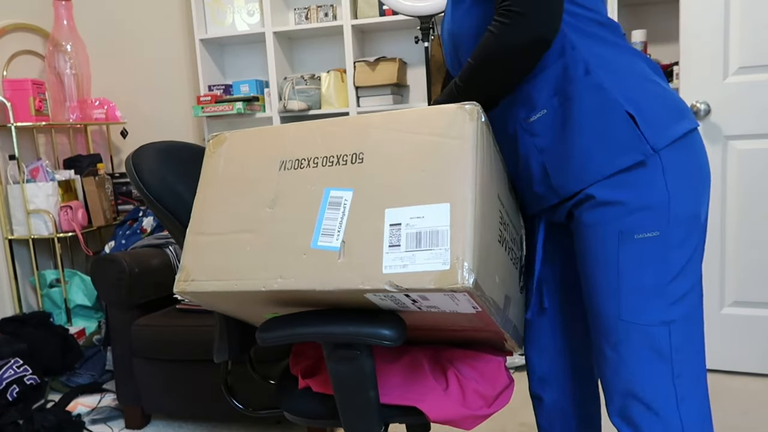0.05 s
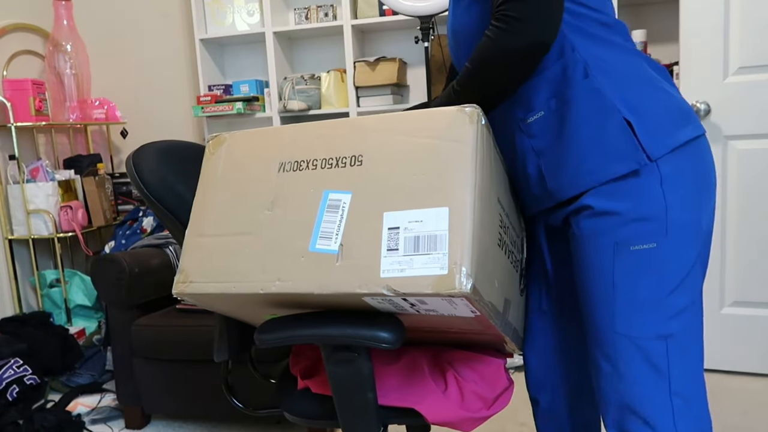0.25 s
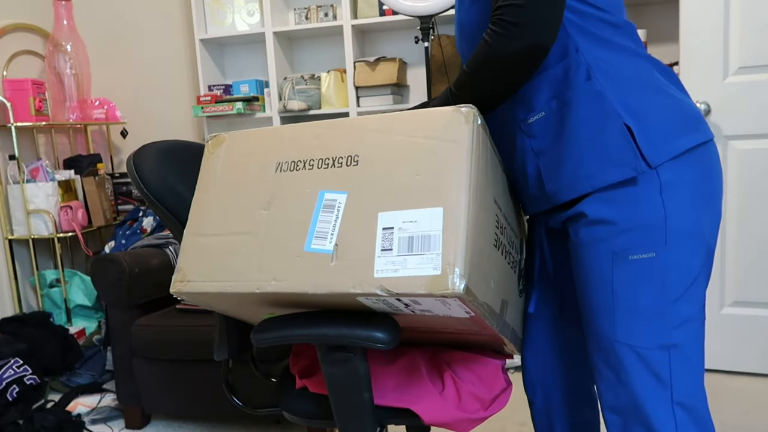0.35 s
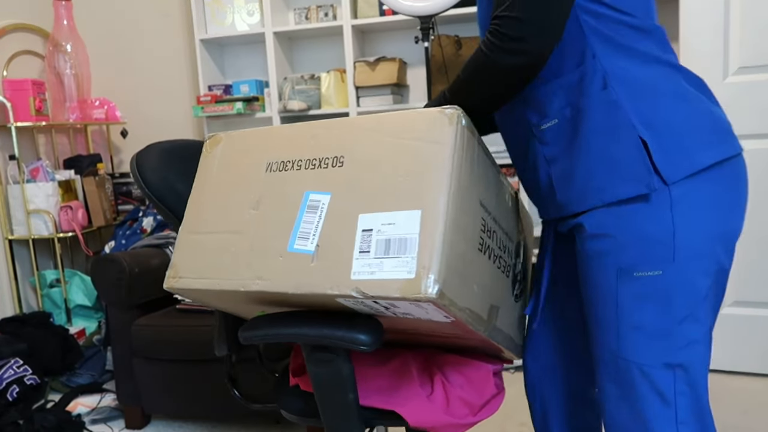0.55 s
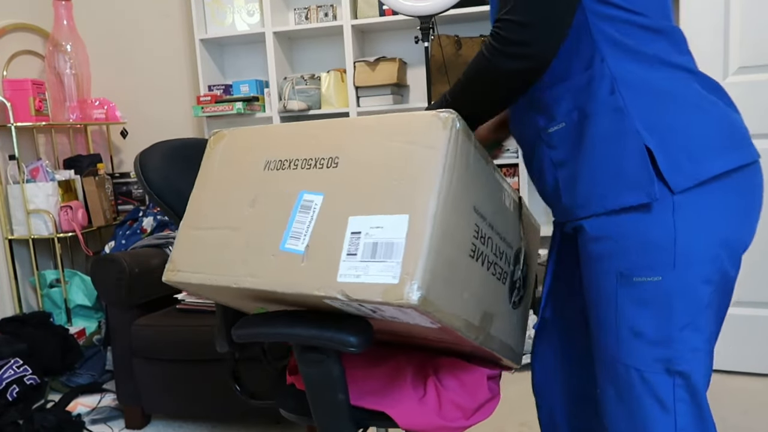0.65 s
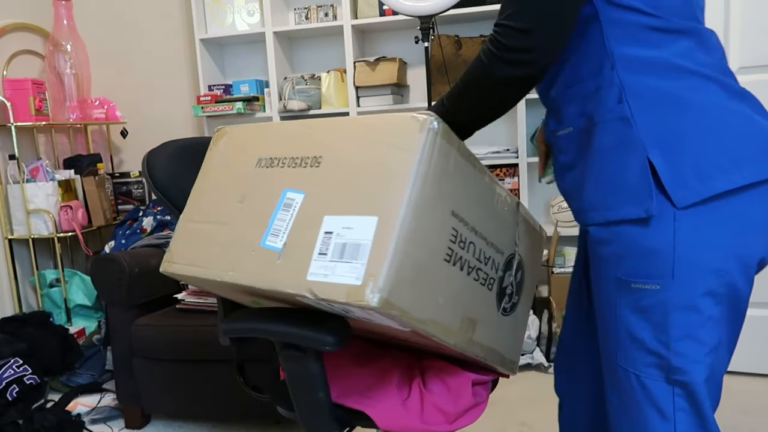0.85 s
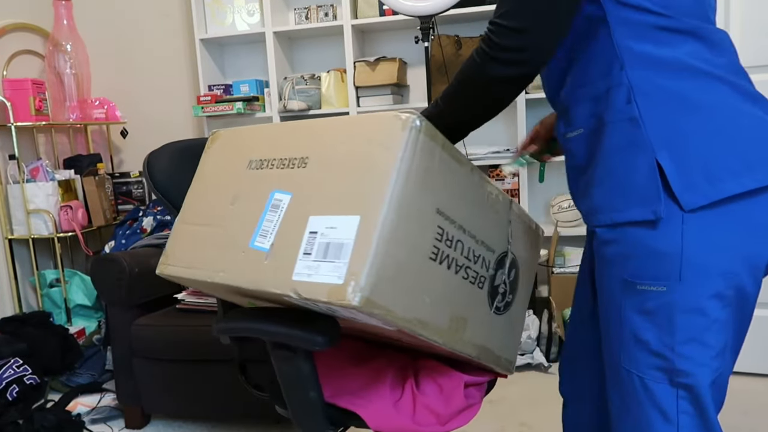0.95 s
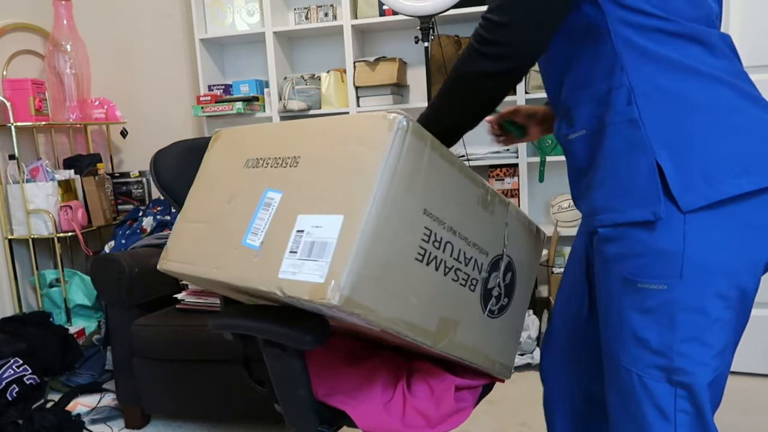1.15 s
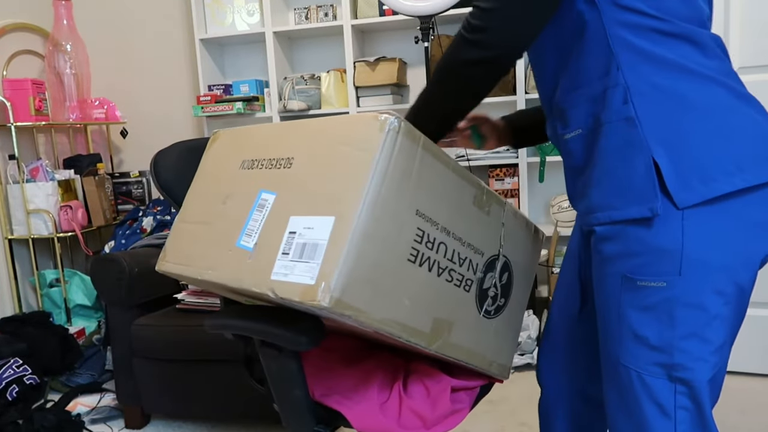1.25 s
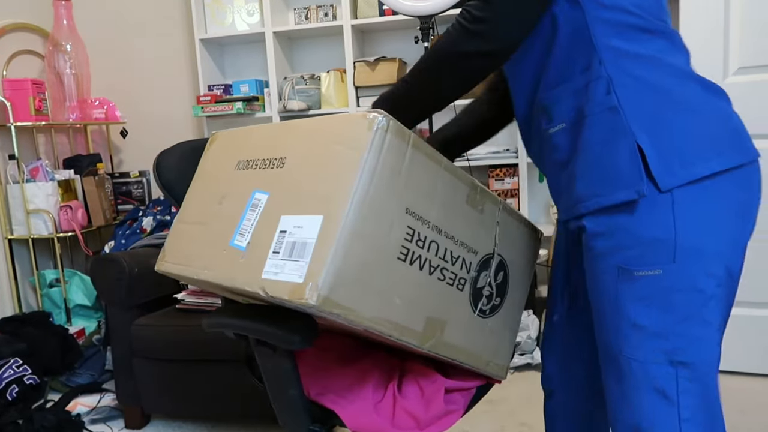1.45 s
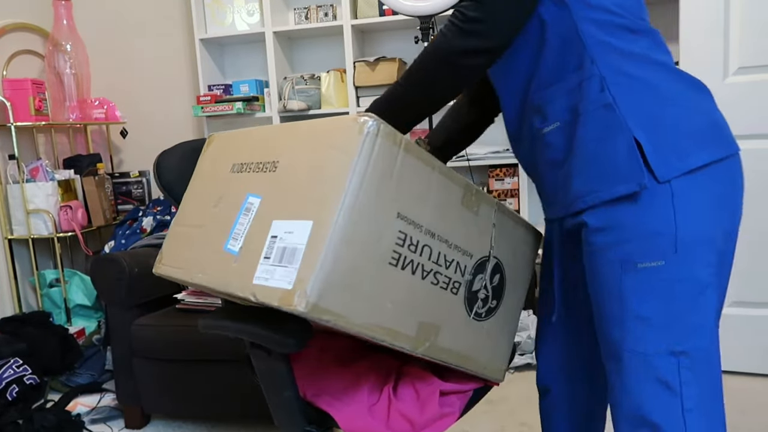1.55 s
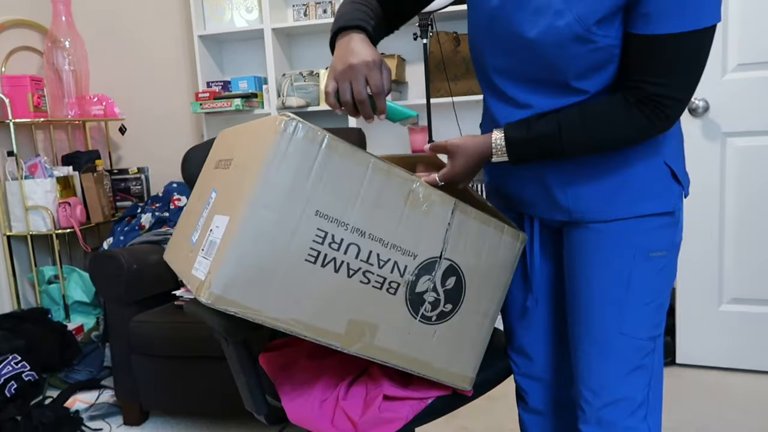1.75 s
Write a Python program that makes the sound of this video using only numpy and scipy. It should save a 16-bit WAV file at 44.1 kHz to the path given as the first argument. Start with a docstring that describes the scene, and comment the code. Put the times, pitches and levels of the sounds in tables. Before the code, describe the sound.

A large cardboard box gives a sharp crunching knock against a chair arm, drags with a rough papery hiss and hollow rumble, slides faintly, then shifts with light taps; close stereo microphone, furnished room.

```python
"""A large cardboard box, dragged across a chair, hisses and hums after a knock on the chair arm; last it shifts gently.
Stick-slip clicks are filtered into the hiss of paper and drive the modes of its skin, panels and hollow.
Impulsive taps, thuds and bumps ring damped modes; a crumpling wall, faint squeaks and a furnished room add to them.
Two close microphone ports hear the bass alike and the treble nearly opposed, over steady room air and a whine.
Near the end the level dips briefly."""
import sys
import numpy as np
from scipy import signal
from scipy.fft import rfft, irfft
from scipy.io import wavfile

SR = 44100
rng = np.random.default_rng(int(sys.argv[2]) if len(sys.argv) > 2 else 0)


def pcm_store(signal):
    """Save signal as 16-bit PCM."""
    levels = np.round(np.clip(np.atleast_2d(signal), -1, 1) * 32767)
    wavfile.write(sys.argv[1], SR, levels.astype(np.int16).T)


def volts_from_db(level):
    """Convert decibel levels to linear amplitude ratios."""
    exponent = np.asarray(level, float) / 20
    return 10 ** exponent


N = 79380   # samples

# panel modes of the box: f/Hz, relative level/dB, t60/s
PANEL_MODES = [(265.3, -6, 0.24), (305, -6, 0.15), (333.4, 1.5, 0.16), (356.4, 0, 0.22), (405.4, 3.5, 0.12),
               (463.8, -2, 0.1), (549, 0, 0.048), (635, -7.5, 0.12), (690, -5, 0.16), (770, -1, 0.08),
               (884, -9, 0.16), (951, -11.5, 0.17), (1014, -9.5, 0.086), (1300, -9.5, 0.052)]
# slow modes of the air and the whole box: f/Hz, relative level/dB, t60/s
HOLLOW_MODES = [(60, -12.5, 0.055), (109.5, 0, 0.096), (164.5, 1.5, 0.16), (206.8, 5, 0.16)]


def rms_one(x):
    """Power normalisation: scale to unit mean square."""
    return x / np.sqrt(np.mean(x ** 2) + 1e-20)


def at_hz(points, hz):
    """Logarithmic frequency scale: interpolate a table's second column along log f."""
    table_hz, values = np.array(points)[:, 0], np.array(points)[:, 1]
    return np.interp(np.log(np.maximum(hz, 1)), np.log(np.maximum(table_hz, 1)), values)


def colour(x, points):
    """Minimum-phase filtering: a folded cepstrum gives the causal filter of a dB response."""
    size = 2 ** 17
    response_db = at_hz(points, np.arange(size // 2 + 1) * SR / size)
    cepstrum = irfft(np.log(volts_from_db(response_db)), size)
    cepstrum[1:size // 2] *= 2
    cepstrum[size // 2 + 1:] = 0
    return irfft(rfft(x, size) * np.exp(rfft(cepstrum)), size)[:N]


def drift(rate_hz):
    """Low-pass noise: two equal poles turn white noise into a slow fluctuation of unit rms."""
    pole = np.exp(-2 * np.pi * rate_hz * 40 / SR)   # one value every 40 samples
    noise = rng.standard_normal(N // 40 + 2002)
    slow = signal.lfilter([1], [1, -2 * pole, pole * pole], noise)[2000:]
    return np.interp(np.arange(N) / 40, np.arange(len(slow)), rms_one(slow))


def ring(drive, hz, t60):
    """Damped resonance: a unit click starts a decaying sine of initial height 1."""
    radius, angle = volts_from_db(-60 / (t60 * SR)), 2 * np.pi * hz / SR
    feedback = [1, -2 * radius * np.cos(angle), radius * radius]
    return signal.lfilter([0, np.sin(angle)], feedback, drive + 1e-18)


def slips():
    """Stick-slip friction: a dense random train of clicks of uneven size and either sign."""
    slips_per_s, spread_db = 3500, 2
    born = rng.random(N) < slips_per_s / SR
    size = volts_from_db(spread_db * np.minimum(rng.exponential(1, N), 5))
    return rms_one(born * size * rng.choice([-1, 1], N))


def shaken(modes, level_db, patchy_db=3.5):
    """Modal superposition: independent slip trains of wandering strength drive every mode."""
    def hum(envelope, drives):
        return sum(volts_from_db(db) * ring(envelope * drive, hz, t60)
                   for (hz, db, t60), drive in zip(modes, drives))
    drives = [slips() * volts_from_db(patchy_db * drift(18.0)) for _ in modes]
    return hum(volts_from_db(level_db), drives) / np.std(hum(1, drives))


def paper_hiss(hiss_db):
    """Friction noise: slips coloured by the paper surface, with more treble as the hiss grows louder."""
    # spectrum of paper on upholstery: f/Hz, level/dB per Hz
    paper_spectrum = [(290, -40), (500, -17.5), (637, 0), (800, -18), (909, -3), (1320, -9), (1430, -5),
                      (3990, -11.5), (6670, -18.5), (15000, -39.5)]
    split_hz, full_hiss_db, patchy_db = 3400, -25, 0.56
    brightens = 0.25   # treble gain, dB per dB of hiss
    hiss = rms_one(colour(slips(), paper_spectrum))
    dull = signal.sosfilt(signal.butter(2, split_hz, fs=SR, output="sos"), hiss)
    treble = signal.sosfilt(signal.butter(2, split_hz, "high", fs=SR, output="sos"), hiss)
    dull_db = patchy_db * drift(33)
    treble_db = brightens * (hiss_db - full_hiss_db) + patchy_db * drift(54)
    return dull * volts_from_db(dull_db) - treble * volts_from_db(treble_db)   # minus: the bands are opposed at the split


def rubbing():
    """Friction-driven vibration: slips hiss and excite the skin, the panels and the hollow."""
    # three stretches of rows: t/s, reference hiss level/dB,
    # panel weight/dB over that reference, whole-box rocking/dB over it (all before the trims below)
    rubbing_rows = [
        [(0.0, -52, 8, 15), (0.028, -58, -3, -27), (0.056, -62, 8.5, 13.5), (0.17, -71.5, 10, -5),
         (.21, -60, 2, -7)],
        [(1.635, -50.5, 9, 10), (1.68, -49.5, 0, 14), (1.72, -51.5, -13, 5), (1.745, -44, -1, -13),
         (1.8, -50, 4, 4)],
        [(0.33, -37, 1, -19), (0.382, -37.5, 3.5, -1.5), (0.5, -32.5, 1, 3.5), (0.545, -29, 2.5, 1),
         (0.58, -28, 9, -2), (0.622, -27, 3, 4), (0.672, -24.5, 3, -4), (0.768, -26, 4.5, 3),
         (0.84, -27.5, 0.5, -4), (0.902, -31, 0, -4), (0.938, -41, -9, -6), (1.016, -50, 3.5, -14),
         (1.026, -46.5, -9.5, -21), (1.11, -48.5, -2, -16), (1.128, -48.5, 12, -10), (1.15, -51, -1, -18),
         (1.21, -50.5, -3.5, -5), (1.278, -47.5, -2, -19), (1.324, -47.5, -2, -20), (1.358, -47, 0, -13),
         (1.486, -50.5, -6.5, -24), (1.514, -50.5, -15, -2), (1.554, -44.5, 5, 10), (1.584, -44, -9, -6),
         (1.6, -52.5, 8, -10)],
    ]
    # thin resonances of the paper skin: f/Hz, relative level/dB, t60/s
    skin_modes = [(1064, 1, 0.033), (1390, -5, 0.036), (1624, -2.5, 0.06), (1949, -2, 0.071),
                  (2372, -0.5, 0.029), (2626, -1.5, 0.026), (2830, -2, 0.023), (3190, -2.5, 0.028),
                  (3340, 0, 0.02), (3900, -3.5, 0.028)]
    surge_db, surge_rate_hz = 1.17, 15   # the drag is uneven
    s, *columns = np.transpose(sorted(map(tuple, np.concatenate(rubbing_rows))))
    hiss_db, weight_db, rocking_db = [np.interp(np.arange(N) / SR, s, c) for c in columns]
    hiss = paper_hiss(hiss_db)
    panels = shaken(PANEL_MODES, hiss_db + weight_db - 2.0)
    hollow = shaken(HOLLOW_MODES, hiss_db + rocking_db - 5.5, patchy_db=1.7)
    surging_db = hiss_db + surge_db * drift(surge_rate_hz)
    skin = shaken(skin_modes, surging_db - 8)
    return hiss * volts_from_db(surging_db - 2.5) + skin + panels + hollow


def squeaks():
    """Frequency locking: slips sustain narrow skin resonances, often several at once, during the slow slide."""
    # faint squeaks: start t/s, length/s, f/Hz, level/dB before the swell
    squeak_rows = [(1.28, 0.13, 1460, -50), (1.35, 0.12, 2420, -51), (1.38, .09, 1356, -50.5),
                   (1.236, .09, 4900, -60), (1.16, 0.05, 3390, -59.5), (1.39, 0.11, 2700, -61),
                   (1.235, 0.055, 3800, -58), (0.95, .04, 2100, -55), (1.06, 0.04, 600, -60)]
    out, t = 0, np.arange(N) / SR
    for start, length, hz, db in squeak_rows:
        swell = np.sin(np.pi * np.clip((t - start) / length, 0, 1))
        out = out + volts_from_db(db) * swell * rms_one(ring(slips(), hz, t60=0.051))
    return out


def crunch():
    """Crackling noise: as the wall crumples under the big knock, fibre snaps swell quickly and decay."""
    # spectrum of the crumpling: f/Hz, level/dB per Hz
    crunch_spectrum = [(180, -23), (330, -5), (700, -10), (1910, -9), (2400, -11), (5180, -14.5),
                       (11000, -30.5), (13800, -29.5), (15000, -95)]
    start_s, rise_s, t60_s, level_db = 0.2246, 0.015, 0.25, -16
    t = np.maximum(np.arange(N) / SR - start_s, 0)
    envelope = np.minimum(t / rise_s, 1) * volts_from_db(level_db - 60 * t / t60_s)
    snaps = slips() + rng.standard_normal(N)
    return rms_one(colour(snaps, crunch_spectrum)) * envelope


def blows(rows, modes, neighbour_sign=1):
    """Impulsive excitation: a short smooth push rings the modes near its favoured pitch; one track a blow."""
    out = np.zeros((len(rows), N))
    luck_db = rng.normal(0, 0.44, (len(rows), len(modes)))
    for k, (s, db, hz, octaves, contact_ms) in enumerate(rows):
        start = int(s * SR)
        shape = np.hanning(int(contact_ms * SR / 1000) + 3)[1:-1]
        push = np.zeros(min(SR // 2, N - start))
        push[:len(shape)] = shape / shape.sum()
        for m, (mode_hz, mode_db, t60) in enumerate(modes):
            off_db = -6 * (np.log2(mode_hz / hz) / octaves) ** 2
            gain = neighbour_sign ** m * volts_from_db(db + mode_db + luck_db[k, m] + off_db)
            out[k, start:start + len(push)] += gain * ring(push, mode_hz, t60)
    return out


def taps():
    """Hard impact: brief contact rings the chair arm and taped edge; returns direct and room-bound sound."""
    # hard taps: t/s, level/dB, favoured f/Hz, breadth/octaves, gain towards the room/dB
    tap_rows = [(0.15, -37, 2170, 0.38, -11), (0.22, -37, 1440, 0.43, -1), (.2277, -10.5, 2210, 0.28, 0.5),
                (.2303, -11, 2090, 0.31, -10), (.2285, -19.5, 2980, 0.16, -4), (0.242, -16, 3200, 0.32, -1),
                (1.734, -23.5, 1476, 0.31, -5.5), (1.769, -24, 4400, 0.13, -9),
                (1.654, -30, 2500, 0.16, -9), (1.638, -38, 2900, 0.2, -10), (.9045, -23.5, 3900, 0.27, -11),
                (.2545, -25, 7100, 0.33, -12)]
    # modes of the hard chair arm and taped edge: f/Hz, relative level/dB
    edge_modes = [(770, -1), (1200, 2.5), (1570, -4.5), (1900, 4.5), (2300, -3), (2750, 0.5), (3200, 8.5),
                  (3800, 9.5), (4400, -7), (5200, -6), (6200, -11), (7500, -12), (9000, -14), (11000, -16),
                  (13500, -14)]
    contact_ms, cycles = 0.12, 17   # cycles in the decay by 60 dB
    rows = [(*row[:4], contact_ms) for row in tap_rows]
    modes = [(hz, db, cycles / hz) for hz, db in edge_modes]
    tracks = blows(rows, modes, neighbour_sign=-1)
    return tracks.sum(axis=0), volts_from_db(np.array(tap_rows)[:, -1]) @ tracks


def thuds():
    """Soft impact: longer contacts favour the lower panel modes."""
    # soft thuds on the panels: t/s, level/dB, favoured f/Hz, breadth/octaves, contact/ms
    thud_rows = [(.2305, -17.5, 770, 0.13, 0.54), (.259, -22.5, 390, 0.31, 2.8),
                 (0.3515, -29, 674, 0.37, 0.49), (.381, -27.5, 423, 0.16, 1.1),
                 (.394, -30.5, 620, 0.46, 0.48), (.423, -24.5, 794, 0.19, .5), (.437, -30, 421, 0.24, 0.93),
                 (.459, -33, 497, 0.41, 0.56), (.473, -28.5, 634, 0.3, 0.43),
                 (.556, -26.5, 328, 0.18, 1.96), (.568, -29, 403, 0.44, 0.92), (.577, -25, 330, 0.13, 0.86),
                 (.586, -26, 690, .2, 0.36), (.625, -26.5, 396, 0.41, 1.44), (.66, -28, 402, 0.16, 1.4),
                 (.71, -28, 342, .2, 0.95), (.745, -26, 342, 0.21, 1.1), (.785, -22.5, 700, 0.27, .5),
                 (.845, -25.5, 443, 0.35, 0.85), (1.125, -42.5, 364, 0.17, 1.9),
                 (1.136, -30, 1030, 0.13, 0.47), (1.134, -39, 690, 0.12, 0.31),
                 (1.143, -37, 361, 0.065, 0.52), (1.271, -49.5, 450, 0.62, 0.59),
                 (1.637, -29.5, 690, 0.083, 0.36), (1.638, -30, 1250, 0.27, 0.2),
                 (1.637, -32.5, 300, 0.14, 0.99), (1.653, -29.5, 305, 0.16, 1.3),
                 (1.655, -30, 1300, .2, .23), (1.663, -35.5, 322, 0.18, 1.33)]
    return blows(thud_rows, PANEL_MODES).sum(axis=0)


def bumps():
    """Low-frequency modal excitation: the whole box settles and bumps, ringing its slow modes."""
    # bumps: t/s, level/dB, favoured f/Hz, breadth/octaves, contact/ms
    bump_rows = [(.235, -26.5, 113, 0.48, 4.1), (.49, -30, 179, .3, 2.6), (.515, -29, 200, 0.22, 1.94),
                 (.538, -24.5, 205, 0.23, 1.6), (.745, -30, 110, 0.27, 2.1), (.76, -12.5, 100.5, 0.39, 4.1),
                 (.835, -18.5, 171, 0.31, 6.9), (.72, -12, 60, .3, 8.9), (.897, -9.5, 60, .3, 5.8),
                 (.925, -31.5, 171, 0.31, 2.8), (1.549, -28, 107, 0.2, 6.7), (1.557, -25, 60, 0.17, 3.4),
                 (1.568, -14, 60, .25, 12)]
    return blows(bump_rows, HOLLOW_MODES).sum(axis=0)


def near_scatter(x):
    """Early scattering: quickly decaying noise of unit energy stands for nearby things."""
    t = np.arange(SR // 20) / SR
    scatter = rng.standard_normal(len(t)) * volts_from_db(-60 * t / 0.026)   # t60 26 ms
    return signal.fftconvolve(x, scatter / np.sqrt(np.sum(scatter ** 2)))[:N]


def room(x):
    """Diffuse reverberation: noise decaying octave by octave, scaled to unit energy."""
    # reverberation time: f/Hz, t60/s
    room_decay = [(100, 0.42), (700, 0.23), (3000, 0.35), (12000, 0.2)]
    first_wall_s = 0.0025   # middle of the onset is at this delay
    t, tail = np.arange(SR // 2) / SR, 0
    edges = 40 * 2. ** np.arange(10)
    for low, high in zip(edges, edges[1:]):
        octave = signal.butter(2, [low, min(high, .45 * SR)], "band", fs=SR, output="sos")
        band = signal.sosfilt(octave, rng.standard_normal(len(t)))
        tail = tail + band * volts_from_db(-60 * t / at_hz(room_decay, np.sqrt(low * high)))
    tail = tail * np.clip(t / first_wall_s - .5, 0, 1)
    return signal.fftconvolve(x, tail / np.sqrt(np.sum(tail ** 2)))[:N]


def port_difference(reflected, near):
    """Pressure difference between two ports: scattered sound is filtered to weak bass and strong treble."""
    # side filter for near sounds: f/Hz, gain/dB
    port_response = [(60, -57), (200, -51), (380, -18), (800, -25), (1000, -45), (1300, -35), (2600, -31),
                     (3400, -9.5), (4350, -1.5), (8030, 7.5), (14800, 21.5)]
    return colour(volts_from_db(2.5) * reflected + volts_from_db(-8) * near, port_response)


def whine():
    """Narrow-band noise: a lightly damped resonance gives a faint electrical whine."""
    hz, width_hz, level_db = 13100, 26, -73
    t60 = np.log(1000) / (np.pi * width_hz)
    return volts_from_db(level_db) * rms_one(ring(rng.standard_normal(N), hz, t60))


def hush():
    """Stationary background noise: independent coloured noises give the room air in middle and sides."""
    # room hush, middle: f/Hz, level/dB per Hz
    air_mid_spectrum = [(18, -41), (30, 11), (260, -7), (524, -16), (1690, -7), (2560, -18.5), (3150, -15),
                        (7240, -29.5), (12800, -37), (15000, -38)]
    # room hush, sides: f/Hz, level/dB per Hz
    air_side_spectrum = [(30, -34), (160, -1.5), (400, -1.5), (780, -9.5), (1500, -17), (2500, -27),
                         (3500, -21), (8000, -26), (15000, -26)]
    mid_db, side_db = -51, -56.5
    mid = volts_from_db(mid_db) * rms_one(colour(rng.standard_normal(N), air_mid_spectrum))
    side = volts_from_db(side_db) * rms_one(colour(rng.standard_normal(N), air_side_spectrum))
    return mid, side


def scene():
    """Mid-side superposition: direct and reflected sound in the middle, only scattered sound at the sides."""
    box = rubbing() + squeaks() + crunch() + thuds() + bumps()
    direct_taps, room_taps = taps()
    direct = box + direct_taps
    sent = volts_from_db(-10.5) * box + room_taps
    air_mid, air_side = hush()
    mid = direct + room(sent) + air_mid + whine()
    # a second, independent room response for the sides
    side = port_difference(room(sent), near_scatter(direct)) + air_side
    return np.array([mid + side, mid - side])


def roll_off(x):
    """The treble ends steeply here."""
    return signal.sosfilt(signal.butter(12, 15410, fs=SR, output="sos"), x)


def record(dry):
    """High-pass response: the microphone cuts the deep bass; then the level dips briefly."""
    mic_cut_hz = 53
    dip_s, dip_half_width_s, dip_floor_db = 1.6195, 0.018, -24
    heard = signal.sosfilt(signal.butter(3, mic_cut_hz, "high", fs=SR, output="sos"), dry)
    away = np.clip(np.abs(np.arange(N) / SR - dip_s) / dip_half_width_s, 0, 1)
    mix = heard * np.maximum(away, volts_from_db(dip_floor_db))
    return roll_off(mix)


dry = scene()
out = record(dry)
pcm_store(out)
```